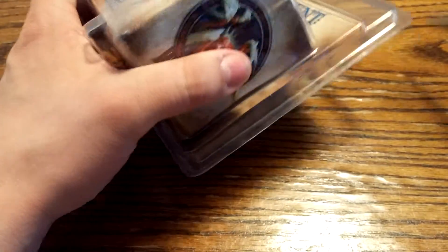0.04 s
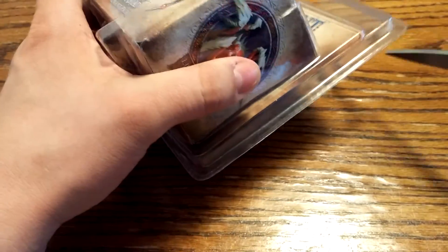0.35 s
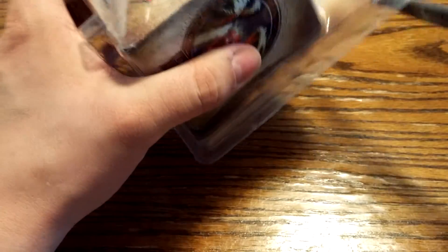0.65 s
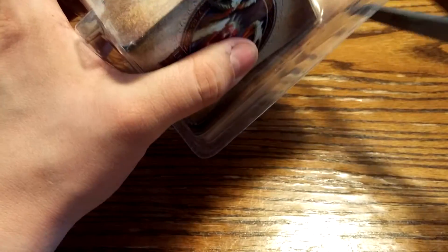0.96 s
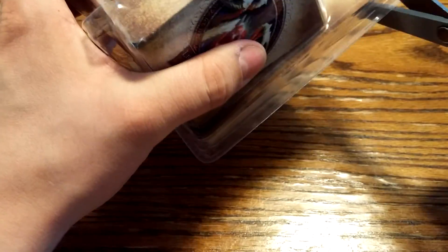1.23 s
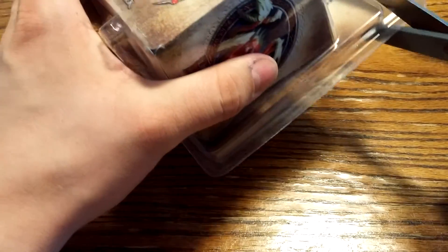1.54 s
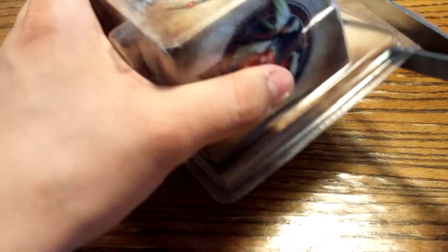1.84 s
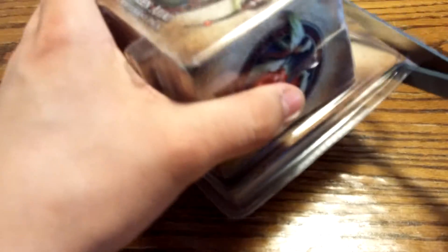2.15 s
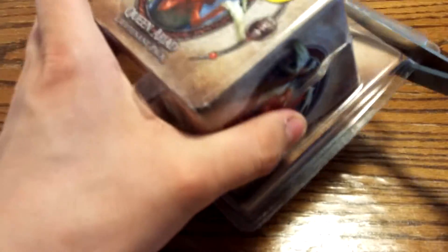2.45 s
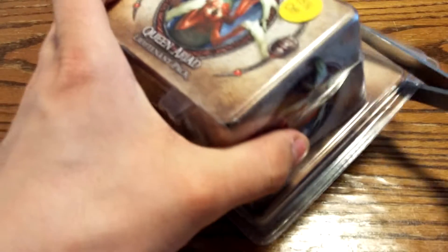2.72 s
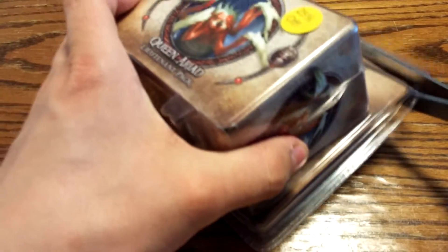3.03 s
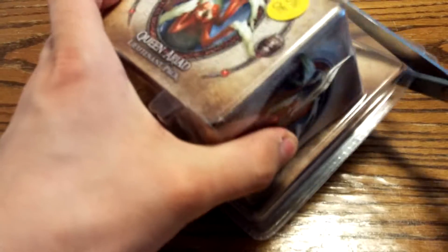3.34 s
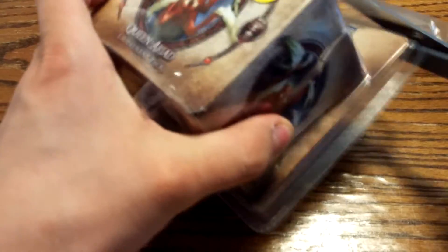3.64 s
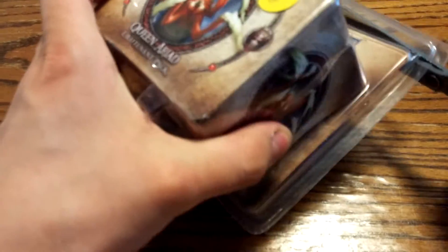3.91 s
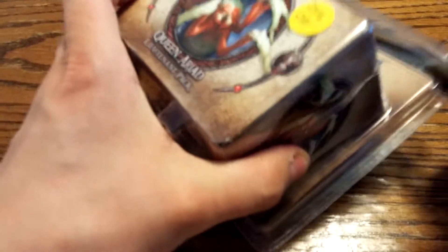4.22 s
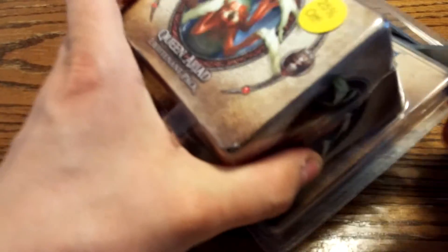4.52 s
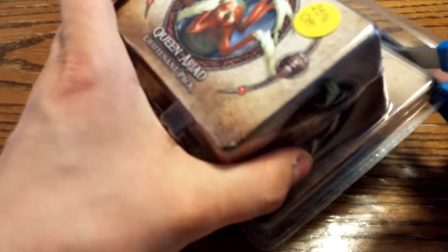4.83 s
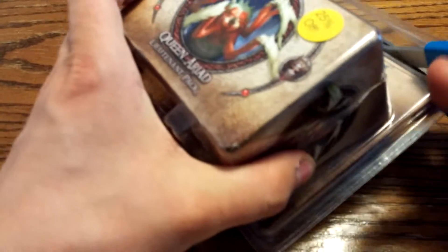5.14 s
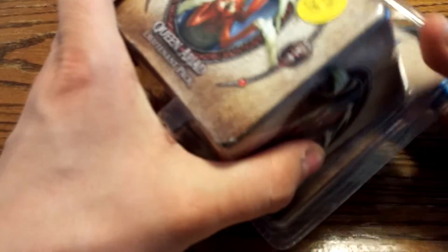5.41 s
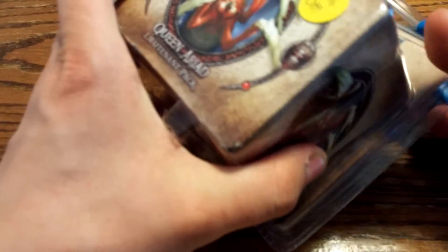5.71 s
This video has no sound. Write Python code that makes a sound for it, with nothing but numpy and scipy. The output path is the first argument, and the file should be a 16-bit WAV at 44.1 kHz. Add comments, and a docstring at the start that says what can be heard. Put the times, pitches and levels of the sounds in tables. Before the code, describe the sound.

Scissors cut into a stiff plastic blister pack on a wooden table, heard close up in a small, quiet room with a short echo. The first second is nearly silent, with only a faint scrape. A few light plastic clicks come between 1.1 and 1.8 seconds. From about 2.7 seconds small ticks and short blade scrapes gather and grow. At 3.5 seconds the shell buckles with a hollow pop, followed at once by a very loud, sharp crack. Irregular snapping continues, mixed with scrapes, tiny squeaks and soft thumps against the table. A hollow pop stands out at 4.2 seconds, a crack near 4.5, and another very loud cluster of cracks at 4.9. More snaps and knocks follow, strongest around 5.5 seconds, and die away by 5.7. The bright ticks sit slightly to the right, and the shell rings faintly after the bigger snaps.

```python
"""Scissors in a plastic pack

Scissors work into a stiff blister pack that a hand holds on a wooden table, close to the microphones.
The shell buckles with hollow pops and snaps: sharp breaks tick high, blunt ones knock, and the shell
sings on faintly. In between, the blades scrape along the rim and the strained plastic squeaks.
A small room answers, and a limiter flattens the biggest cracks."""
import sys
import numpy as np
from scipy import signal
from scipy.fft import rfft, irfft
from scipy.io import wavfile
from scipy.ndimage import uniform_filter1d, minimum_filter1d

SR = 44100
rng = np.random.default_rng(int(sys.argv[2]) if len(sys.argv) > 2 else 0)


def dump_mix(stems):
    """Bounce the given channels to the path in sys.argv[1] as a 16-bit WAV at rate SR."""
    frames = np.atleast_2d(stems).T  # one column per channel
    limited = np.clip(frames, -1, 1)  # hard clip at full scale
    pcm = np.round(limited * 32767).astype(np.int16)
    wavfile.write(sys.argv[1], SR, pcm)


N = 254456

# Tone colour of the room's steady noise: pitch_hz, level_db
ROOM_NOISE_COLOUR = [(15, -68), (25, -23), (108, -4.5), (157, -1.5), (185, -8), (317, -5), (695, -17.5),
                     (900, -13.5), (1130, -23.5), (1560, -20.5), (3500, -27.5), (16000, -28.5)]
# Tone colour of the deep rumble: pitch_hz, level_db
RUMBLE_COLOUR = [(15, -21.5), (40, 23), (90, -15.5), (200, -27), (500, -65)]
# Tone colour of the room's echo: pitch_hz, level_db
ECHO_COLOUR = [(100, -5.5), (170, -3), (220, -10), (300, -4), (450, -9), (550, -12.5), (700, -11),
               (1100, -13), (1700, -10.5), (2800, -4), (4500, -8), (10000, -9.5), (15000, -4)]
# How long the echo takes to fade by 60 dB: pitch_hz, fade_s
ECHO_FADES = [(100, .22), (300, .25), (550, .3), (1500, .29), (9000, .29), (12000, .23), (15000, .2)]
# How much of a snap spreads into the room as the hand lifts and tilts the pack: time_s, share_db
ROOM_SHARE = [(0, -2), (1.2, 3.5), (1.62, 3.5), (1.67, 2.5), (2.3, 4.5), (2.8, 7), (3.15, -5), (3.5, -3.5),
              (3.58, 0.75), (3.77, 3), (4.02, -7), (4.2, -2), (4.5, -2.5), (4.85, -1), (5.25, -2),
              (5.43, -1), (5.7, -7)]
# The hollow shell's own notes: pitch_hz, knock_level_db, knock_fade_s (to fall 60 dB), after_ring_db
SHELL_NOTES = [(151.6, -10.5, 0.092, -9), (211.2, -6.5, 0.06, -1), (279.6, -2, 0.036, 1),
               (325.8, 5, 0.033, -9), (421.5, 4, 0.042, -8), (485.3, 4.5, 0.025, 1),
               (554, -0.5, 0.071, -18.5), (660, -3, 0.053, -6), (799.6, -2.5, 0.077, -5),
               (864, 4.5, 0.037, -14.5), (963, 2.5, 0.027, -1.5), (1165, 8, 0.03, -17.5),
               (1714, -7.5, 0.018, -2.5), (2370, -11.5, .03, -0.5), (2630, -2.5, 0.019, -11),
               (3060, -2.5, .02, 0), (3725, -16, .02, -3)]
# Tone colour of the rubbed shell: pitch_hz, level_db
RUB_COLOUR = [(60, -14.5), (180, -11.5), (300, 1.5), (440, 5), (620, -5), (790, 2), (1050, -13),
              (1500, -9.5), (3000, -40)]
# Tone colour of a crack in the plastic sheet: pitch_hz, level_db
CRACK_COLOUR = [(500, -71.5), (900, 5), (1200, 5.5), (1500, -0.5), (1850, -1), (2150, -2), (2500, -3.5),
                (3200, -4), (4300, -3.5), (5500, -5.5), (9000, -48)]
# Tone colour of the sheet's sharp tick: pitch_hz, level_db
TICK_COLOUR = [(2000, -105.5), (4000, -8), (5200, 3), (7500, 0), (9800, 1.5), (11200, -5.5), (12800, -11),
               (15500, -11), (17000, -79)]
# The pack is pressed onto the table: start_s, level_db
THUMPS = [(1.34, -59.5), (1.466, -56), (1.551, -58), (3.578, -29), (4.023, -43.5), (4.184, -36),
          (4.644, -36.5), (4.857, -37), (5.006, -32.5), (5.276, -31), (5.477, -46.5), (5.505, -34)]
# Squeaks of the strained plastic, and at 2.18 s a thin hiss of the blades: start_s, length_s, pitch_hz,
# level_db
SQUEAKS = [(0.582, 0.12, 1530, -84), (2.18, 0.043, 6080, -67.5), (3.224, 0.012, 573, -50),
           (3.787, 0.0078, 1065, -39), (4.225, 0.055, 1016, -43.5), (4.336, 0.0082, 920, -44),
           (4.599, 0.019, 1673, -39.5), (4.741, 0.021, 393, -47), (5.723, 0.0065, 1564, -38)]
# Strokes of blade on plastic: start_s, end_s, strength_db, sharpness_db
SCRAPES = [(0, 0.026, -62, 2.5), (0.014, 0.219, -76.5, 2), (1.172, 1.299, -64.5, -8.5),
           (1.46, 1.535, -73.5, -3.5), (2.627, 2.68, -74, 12.5), (2.699, 2.757, -75.5, -11),
           (2.778, 2.868, -59, -2), (2.886, 2.963, -67.5, -2), (2.964, 3.167, -73, -0.5),
           (3.172, 3.208, -48.5, 3), (3.227, 3.286, -60, -7.5), (3.272, 3.339, -44, -1),
           (3.385, 3.519, -67.5, -1), (3.784, 3.865, -44.5, -5), (3.9, 3.959, -54, 0),
           (3.983, 4.05, -45, -0.5), (4.159, 4.186, -52, -10), (4.24, 4.269, -53, -11),
           (4.366, 4.408, -46.5, -1.5), (4.462, 4.467, -29.5, 3), (4.474, 4.514, -49, -7.5),
           (4.58, 4.675, -42, -1.5), (5.005, 5.032, -37, -2.5), (5.037, 5.106, -53.5, -7),
           (5.2, 5.228, -54, -4), (5.236, 5.296, -50.5, -2.5), (5.534, 5.599, -38.5, -6.5),
           (5.599, 5.662, -48, -9)]
# The blister's wall pops through and the air inside booms: start_s, pop_db, pop_hz, boom_db
POPS = [(3.5075, -19, 370, -27), (3.5096, -23.5, 886, -33), (3.5812, -15, 466, -19.5),
        (4.182, -18.5, 411, -26.5), (4.1876, -19, 417, -32.5), (4.8687, -20, 400, -25),
        (5.3846, -24.5, 656, -35.5)]
# Snaps of the plastic:
# start_s, knock_db, crack_db, tick_db, knock_hz, crack_hz, tick_hz, knock_spread_octaves, tear_s
SNAPS = [(0.263, -67, -78, -78, 620, 2300, 9400, 0.6, 0.0019),
         (0.877, -64, -70, -69, 500, 2500, 6200, 0.5, 0.0016),
         (1.1558, -43, -47.5, -56.5, 600, 2900, 6540, 0.7, 0.0031),
         (1.298, -51, -57, -55, 690, 2700, 7100, 0.34, 0.0037),
         (1.457, -63.5, -78, -81, 950, 2500, 7000, 0.6, 0.003),
         (1.544, -56.5, -69, -86, 270, 2100, 8800, 0.7, 0.0021),
         (1.618, -50.5, -46.5, -47, 670, 2900, 6300, 1.1, 0.003),
         (1.651, -56, -74, -70, 700, 3000, 8500, 0.8, 0.006),
         (1.669, -69, -62, -63, 700, 3600, 8500, 0.8, 0.001),
         (1.723, -58.5, -58.5, -67, 550, 3900, 8440, 0.5, 0.0043),
         (1.7702, -55.5, -58.5, -64, 580, 3600, 8000, 0.7, 0.0027),
         (2.229, -90, -73, -53.5, 480, 4600, 7100, 1.3, 0.0087),
         (2.445, -78, -69, -66, 430, 3300, 8600, 0.6, 0.001),
         (2.673, -64, -66, -55, 500, 3600, 10000, 0.8, 0.001),
         (2.682, -61.5, -56, -52.5, 410, 3600, 10600, 1.2, 0.0004),
         (2.698, -55, -69, -73, 530, 2900, 8200, 1.2, 0.0015),
         (2.723, -60.5, -74, -67, 500, 3600, 10000, 0.8, 0.0016),
         (2.779, -51.5, -55, -52.5, 680, 3000, 8050, 0.9, 0.0055),
         (2.794, -68, -54, -61, 600, 3000, 9500, 0.8, 0.0012),
         (2.888, -59.5, -61, -61.5, 800, 3000, 6500, 0.8, 0.0033),
         (3.071, -69, -61, -54.5, 650, 3100, 9600, 1.0, 0.0026),
         (3.0899, -61, -57, -47, 610, 4000, 8000, 0.7, 0.00097),
         (3.111, -74, -64, -51, 520, 3500, 8950, 1.3, 0.0007),
         (3.136, -55.5, -65, -67, 700, 2400, 8000, 0.6, 0.0018),
         (3.1594, -53.5, -54, -48.5, 710, 2600, 8500, 1.0, 0.00062),
         (3.1833, -44.5, -48, -38, 520, 2500, 8300, 1.0, 0.0028),
         (3.203, -50.5, -48.5, -45, 520, 2600, 7400, 0.8, 0.0033),
         (3.283, -40.5, -41.5, -48, 600, 2400, 7680, 0.8, 0.0022),
         (3.336, -45, -54, -53, 320, 2400, 7500, 0.6, 0.0053),
         (3.5063, -19.5, -23, -33.5, 750, 1850, 8250, 0.8, 0.0033),
         (3.553, -41, -50, -45, 500, 3500, 7000, 0.8, 0.0064),
         (3.5729, -11.5, -11.5, -9.5, 700, 2780, 7630, 0.9, 0.0039),
         (3.5776, -12, -15, -21.5, 803, 2070, 9200, 1.1, 0.0042),
         (3.7704, -35.5, -43.5, -49.5, 420, 3000, 9000, 0.7, 0.0026),
         (3.774, -45.5, -46, -38.5, 500, 3600, 13200, 0.8, 0.00077),
         (3.895, -48.5, -52.5, -50, 500, 3000, 8900, 1.1, 0.001),
         (3.964, -29.5, -38, -42, 350, 2000, 7570, 0.92, 0.0077),
         (3.9874, -41, -45.5, -37, 390, 2400, 6900, 1.1, 0.0008),
         (4.022, -34, -43.5, -48, 470, 2600, 7300, 0.7, 0.0048),
         (4.181, -18, -29, -27.5, 685, 2700, 7000, 0.6, 0.0025),
         (4.195, -24, -30, -25.5, 390, 2900, 8600, 0.6, 0.0024),
         (4.2167, -54, -34, -28.5, 430, 3300, 8900, 1.3, 0.0012),
         (4.284, -36.5, -40.5, -33, 560, 3600, 9200, 0.7, 0.0016),
         (4.372, -36.5, -50, -69, 560, 2300, 7800, 0.3, 0.0036),
         (4.4231, -27.5, -30, -36.5, 700, 2100, 7860, 1.3, 0.0069),
         (4.465, -21, -17, -21.5, 640, 3500, 7440, 1.2, 0.0027),
         (4.5128, -28, -27.5, -30, 1120, 2600, 7000, 1.2, 0.0031),
         (4.596, -39.5, -42, -33, 1090, 2900, 7450, 0.6, 0.0008),
         (4.6395, -36, -43.5, -44, 450, 3000, 7950, 0.8, 0.00087),
         (4.6671, -34.5, -33, -34.5, 530, 2400, 7660, 1.2, 0.0039),
         (4.691, -46, -51, -45, 600, 3200, 8400, 0.8, 0.0012),
         (4.7277, -52, -59, -47.5, 310, 3300, 8000, 0.8, 0.001),
         (4.8067, -28.5, -34, -38.5, 1080, 2100, 7800, 0.65, 0.0039),
         (4.8526, -27, -35, -26, 500, 3600, 6530, 0.8, 0.0025),
         (4.8554, -15, -13.5, -9.5, 520, 3500, 7900, 1.1, 0.0057),
         (4.8599, -17.5, -21, -17, 950, 3300, 7130, 0.9, 0.0047),
         (4.865, -32, -16.5, -19, 500, 3600, 6800, 1.0, 0.0011),
         (4.8701, -24, -24.5, -17.5, 450, 3800, 7500, 0.8, 0.00068),
         (4.888, -26, -39, -31, 444, 4000, 7500, 0.6, 0.0015),
         (4.935, -22, -25, -26.5, 510, 2700, 6800, 0.7, 0.0019),
         (5.0076, -44, -29, -45.5, 640, 1700, 7000, 1.0, 0.0095),
         (5.03, -27.5, -33, -47, 460, 2000, 6160, 0.6, 0.0044),
         (5.088, -57, -38, -50, 710, 2300, 5400, 1.3, 0.0014),
         (5.098, -41.5, -42, -50, 900, 2000, 5450, 0.8, 0.0015),
         (5.1201, -43.5, -37.5, -41.5, 650, 2700, 5800, 1.3, 0.00072),
         (5.2342, -29, -34, -41, 420, 2200, 6500, 1.3, 0.0026),
         (5.2597, -61, -63, -60, 500, 3200, 8000, 0.8, 0.00066),
         (5.2669, -43, -60, -45, 500, 3400, 7400, 0.8, 0.00072),
         (5.276, -27, -34.5, -40, 430, 1900, 6700, 1.3, 0.0042),
         (5.3829, -25, -37, -46, 400, 2200, 7040, 0.7, 0.0026),
         (5.4253, -35, -33, -25.5, 720, 3400, 5450, 1.3, 0.0006),
         (5.4452, -34.5, -33, -36, 360, 3000, 7260, 0.8, 0.00091),
         (5.4721, -19.5, -24, -21, 470, 2700, 6400, 0.6, 0.0032),
         (5.5024, -22.5, -25, -23.5, 540, 1800, 8000, 0.7, 0.0038),
         (5.556, -32.5, -33, -36, 500, 2500, 8500, 0.8, 0.0037),
         (5.566, -35, -36.5, -29.5, 500, 2800, 7150, 1.3, 0.0013),
         (5.6211, -33, -32, -20.5, 440, 3600, 7650, 1.2, 0.0026)]


def amp(db):
    """Turns decibels into a number to multiply by."""
    return 10 ** (np.asarray(db) / 20)


def value_at(table, hz):
    """Looks up a table's value at any pitch, sliding smoothly between its rows."""
    pitches, values = np.transpose(table)
    return np.interp(np.log(hz + 1), np.log(pitches + 1), values)


def add(mix, start_s, sound):
    """Mixes a sound in at the given time."""
    part = mix[:, max(0, round(start_s * SR)):][:, :sound.shape[1]]
    part += sound[:, :part.shape[1]]


def unit_level(x):
    """Scales a sound to an average (rms) level of 1."""
    return x / np.sqrt(np.mean(x ** 2) + 1e-20)


def unit_hit(x):
    """Scales a hit to the energy of 10 ms at level 1."""
    return unit_level(x) * np.sqrt(SR / 100 / x.shape[1])


def pan(db):
    """Left and right gains; a negative db puts the sound on the right."""
    return unit_level(amp([[db / 2], [-db / 2]]))


def coloured(x, colour):
    """Gives a sound a tone colour, with a filter that never rings ahead of a hit."""
    log_gain = np.log(amp(value_at(colour, abs(np.fft.fftfreq(2048, 1 / SR)))))
    taps = np.fft.ifft(np.exp(np.conj(signal.hilbert(log_gain)))).real
    return signal.fftconvolve(x, taps[None, :len(taps) // 2], axes=1)[:, :x.shape[1]]


def noise_pair(count, apart):
    """Noise at two microphones; apart (0 to 1) is the share they do not have in common."""
    noise = rng.standard_normal((3, count))
    return np.sqrt(1 - apart) * noise[0] + np.sqrt(apart) * noise[1:]


def ring(x, hz, width_hz):
    """Lets a sound ring at one pitch; a narrower width rings longer."""
    decay = np.exp(-np.pi * width_hz / SR)
    return signal.lfilter([1, 0, -1], [1, -2 * decay * np.cos(2 * np.pi * hz / SR), decay ** 2], x)


def background(hum_hz=158.6, hum_db=-80, whine_hz=1056, whine_db=-89):
    """Faint room noise and rumble, with a low hum and a thin whine."""
    t = np.arange(N) / SR
    hum = amp(hum_db) * unit_level(np.sin(2 * np.pi * hum_hz * t))
    whine = amp(whine_db) * unit_level(np.sin(2 * np.pi * whine_hz * t))
    rumble = amp(-78) * unit_level(coloured(noise_pair(N, apart=.51), RUMBLE_COLOUR))
    noise = amp(-69.5) * unit_level(coloured(noise_pair(N, apart=.44), ROOM_NOISE_COLOUR))
    return noise + rumble + hum + whine


def reflections(first_s=.001, build_s=.004, bounces_per_s=5000):
    """The room's answer to one click: bounces build up, then each pitch dies at its own speed."""
    t = np.arange(SR // 2) / SR
    bounces = rng.standard_normal((2, len(t))) * (rng.random((2, len(t))) < bounces_per_s / SR)
    bounces *= 1 - np.exp(-np.maximum(t - first_s, 0) / build_s)
    hz, times, bands = signal.stft(bounces, SR, nperseg=256)
    fade = np.exp(-np.log(1000) * times / value_at(ECHO_FADES, hz)[:, None])
    shared = 1 / (1 + (hz[:, None] / 450) ** 2)  # long waves reach both microphones alike
    bands[1] = np.sqrt(shared) * bands[0] + np.sqrt(1 - shared) * bands[1]
    tail = signal.istft(bands * fade, SR, nperseg=256)[1]
    return coloured(tail / np.linalg.norm(tail, axis=1, keepdims=True), ECHO_COLOUR)


def room_echo(x, patterns=6, split_hz=2500, low_turn_s=.003, high_turn_s=.0008):
    """The room's smooth echo; several echo patterns take quick turns so it does not sound metallic."""
    out, t = np.zeros((2, N)), np.arange(N) / SR
    mono = x.sum(0) / np.sqrt(2)
    low = signal.sosfiltfilt(signal.butter(2, split_hz, fs=SR, output="sos"), mono)
    for pattern in range(patterns):
        feed = 0
        for band, turn_s in ((low, low_turn_s), (mono - low, high_turn_s)):
            turns_away = abs((t / turn_s - pattern) % patterns - patterns / 2)
            feed = feed + band * np.cos(np.pi / 2 * np.minimum(turns_away, 1))
        out += signal.oaconvolve(feed[None], reflections(), axes=1)[:, :N]
    return pan(-1.7) * out


def after_ring(x, longest_s=.38, half_as_long_hz=1700, boost_db=2.5):
    """Away from the damping hand the shell sings on faintly at its own notes, the low ones longest."""
    out = 0
    for hz, _, _, db in SHELL_NOTES:
        fade_s = longest_s / (1 + hz / half_as_long_hz)
        width_hz = np.log(1000) / (np.pi * fade_s)
        out = out + amp(db + boost_db) * ring(x, hz, width_hz) * np.pi * width_hz / SR
    return out


def table_thumps(near_hz=(88, 135), rise_s=.012, decay_s=.0058):
    """The table takes a soft push through the pack and gives two low, short tones."""
    out, t = np.zeros((2, N)), np.arange(SR // 8) / SR
    swell = np.exp(-t / decay_s) * (1 - np.exp(-t / rise_s))
    for start_s, db in THUMPS:
        tones = sum(np.sin(2 * np.pi * hz * rng.uniform(.88, 1.137) * t) for hz in near_hz)
        add(out, start_s, amp(db) * pan(-5) * unit_hit((tones * swell)[None]))
    return out


def creaks(start_s=2.75, end_s=5.7, per_s=14, length_s=.0084, centre_hz=877, octaves=.27, db=-60):
    """Faint creaks at chance moments while the blades bear on the rim, as rows like those of SQUEAKS."""
    span_s = end_s - start_s
    return [(start_s + span_s * when, length_s, centre_hz * 2 ** (octaves * (2 * pitch - 1)), db)
            for when, pitch in rng.random((round(span_s * per_s), 2))]


def squeaks(wobble=.13, overtone_db=-14):
    """For an instant tiny slips fall into step and give a wavering pitch."""
    out = np.zeros((2, N))
    for start_s, length_s, hz, db in SQUEAKS + creaks():
        count = round(length_s * SR)
        waver = unit_level(uniform_filter1d(rng.standard_normal(count), size=30))
        angle = 2 * np.pi * np.cumsum(hz * (1 + wobble * waver)) / SR
        tone = np.sin(angle) + amp(overtone_db) * np.sin(2 * angle)
        tone *= signal.windows.tukey(count, .7)
        add(out, start_s, amp(db) * pan(-2.7) * unit_level(tone))
    return out


def blade_scrapes(slips_per_s=900, at_strength_db=-45, doubling_db=12, slip_decay_s=.004):
    """The blade sticks and slips: tiny cracks that shake the shell, packed closer in a harder stroke."""
    out = np.zeros((2, N))
    for start_s, end_s, strength_db, sharpness_db in SCRAPES:
        count = round((max(end_s - start_s, .01) + .0074) * SR)
        slip_chance = slips_per_s * 2 ** ((strength_db - at_strength_db) / doubling_db) / SR
        sizes = amp(1.5 * np.minimum(rng.exponential(1, count), 3.5))
        kicks = sizes * (rng.random(count) < slip_chance)
        slips = signal.lfilter([1], [1, -np.exp(-1 / (slip_decay_s * SR))], kicks)
        stroke = (unit_level(slips) + .3) * signal.windows.tukey(count, .4)  # .3 adds a smooth rub
        stroke = np.pad(stroke, (0, SR // 50))
        # A sharp stroke puts its energy into the tick, a blunt one into the shell.
        for colour, db, apart, side_db in ((RUB_COLOUR, strength_db - sharpness_db, .15, 0),
                                           (CRACK_COLOUR, strength_db - .4, .55, 0),
                                           (TICK_COLOUR, strength_db + sharpness_db, .7, -10.5)):
            grains = unit_level(coloured(noise_pair(len(stroke), apart) * stroke, colour))
            grains *= np.sqrt(count / len(stroke))  # the padding must not change the level
            add(out, start_s - .004, amp(db) * pan(side_db) * grains)
    return out


def wall_flip(t, hz, cycles):
    """The plastic wall jumps to its new shape: a push and a swing back."""
    progress = t * hz / cycles
    return unit_hit((progress * np.exp(-2 * progress) * np.sin(2 * np.pi * hz * t))[None])


def blister_pops(air_hz=297, fade_s=.073, rise_s=.0037):
    """The wall pops through and sets the air in the blister ringing."""
    out, t = np.zeros((2, N)), np.arange(SR // 4) / SR
    swell = np.exp(-np.log(1000) * t / fade_s) * (1 - np.exp(-t / rise_s))
    boom = unit_hit((np.sin(2 * np.pi * air_hz * t) * swell)[None])
    for start_s, pop_db, pop_hz, boom_db in POPS:
        pop = amp(pop_db) * wall_flip(t, pop_hz, cycles=1.48)
        add(out, start_s, pan(-1.2) * (pop + amp(boom_db) * boom))
    return out


def shell_knock(t, centre_hz, octaves, tear_s, flip_db=-5.5):
    """The shell flips and rings; the place where it buckles favours the notes around one pitch."""
    hz, db, fade_s, _ = np.transpose(SHELL_NOTES)[:, :, None]
    detune, size, phase, mic_offset = rng.standard_normal((4, len(hz), 1))
    weight = amp(db + .5 * size) * np.exp(-(np.log2(hz / centre_hz) / octaves) ** 2 / 2)
    signs = (-1) ** np.arange(len(hz))[:, None]  # neighbouring notes swing opposite ways
    bend = 1 + .025 * rng.uniform(-1, 1)  # bending shifts all the notes a little
    angle = 2 * np.pi * hz * bend * (1 + .012 * detune) * t + phase * tear_s * 700
    rise = 1 - np.exp(-t / (.21 * tear_s))
    swing = signs * weight * rise * np.exp(-np.log(1000) * t / fade_s)
    lag = .55 * mic_offset * (hz / 600) ** 2  # short waves differ more between the microphones
    notes = np.array([(swing * np.sin(angle + side * lag)).sum(0) for side in (-1, 1)])
    return unit_hit(unit_hit(notes) + amp(flip_db) * wall_flip(t, centre_hz, cycles=1.43))


def tear(t, tear_s, ring_s, linger_db, linger_s, apart):
    """A tear starts at once and runs for a moment; the sheet rings out longer after a long tear."""
    burst = np.exp(-np.maximum(t - tear_s, 0) / ring_s)
    linger = amp(linger_db) * np.exp(-t / (linger_s + 2 * tear_s))
    rise = 1 - np.exp(-t / (.0001 + .06 * tear_s))
    return noise_pair(len(t), apart) * (burst + linger) * rise


def sheet_crack(t, centre_hz, tear_s, bluntness_db, focus_db=3):
    """The tearing sheet gives a burst of noise around one pitch; a blunt break has less treble."""
    hz, db = np.transpose(CRACK_COLOUR)
    octaves_up = np.log2(hz / centre_hz)
    off_centre_db = focus_db * np.minimum(octaves_up ** 2, 4)
    dulling_db = 1.37 * bluntness_db * np.maximum(octaves_up - .3, 0)
    burst = tear(t, tear_s, ring_s=.003, linger_db=-20, linger_s=.005, apart=.72)
    return unit_hit(coloured(burst, list(zip(hz, db - off_centre_db - dulling_db))))


def sharp_tick(t, centre_hz, tear_s, focus_db=13.5, ring_db=-13, click_db=-3):
    """The first edge of a snap: a bright click and a burst around one pitch, with a brief ring."""
    burst = tear(t, tear_s * .5, ring_s=.0009, linger_db=-16, linger_s=.004, apart=.65)
    colour = [(hz, db - focus_db * np.log2(hz / centre_hz) ** 2) for hz, db in TICK_COLOUR]
    edge = coloured(burst, colour)
    ringing = amp(ring_db) * unit_hit(ring(edge, centre_hz, width_hz=2400))
    spike = np.diff(noise_pair(len(t) + 1, apart=.4)) * np.exp(-t / (.0003 + .3 * tear_s))
    click = amp(click_db) * unit_hit(coloured(spike, TICK_COLOUR))
    return unit_hit(unit_hit(edge) + ringing + click)


def plastic_snaps():
    """Bending waves bring the tick, then the crack, then the knock; returns direct and room sound."""
    direct, to_room = np.zeros((2, N)), np.zeros((2, N))
    t = np.arange(SR // 8) / SR
    for start_s, knock_db, crack_db, tick_db, knock_hz, crack_hz, tick_hz, octaves, tear_s in SNAPS:
        share_db = np.interp(start_s, *np.transpose(ROOM_SHARE))
        tick = amp(tick_db) * pan(-11.5) * sharp_tick(t, tick_hz, tear_s)  # the blades are on the right
        crack = amp(crack_db) * sheet_crack(t, crack_hz, tear_s, bluntness_db=max(crack_db - tick_db, 0))
        knock = amp(knock_db) * pan(-2.2) * shell_knock(t, knock_hz, octaves, tear_s)
        for delay_s, sound in ((0, tick), (.0005, crack), (.0006, knock)):
            add(direct, start_s + delay_s, sound)
            add(to_room, start_s + delay_s, amp(share_db) * sound)
    return direct, to_room


def delay_left(x, lag_s=.00007):
    """The pack lies nearer the right microphone, so its sound reaches the left one a little later."""
    delay = np.exp(-2j * np.pi * np.fft.rfftfreq(N, 1 / SR) * lag_s)
    return np.array([irfft(rfft(x[0]) * delay, N), x[1]])


def scene(low_cut_hz=55):
    """Mixes pack, table and room; the small pack gives off no deep bass."""
    snaps, snaps_to_room = plastic_snaps()
    handling = blade_scrapes() + table_thumps() + squeaks()
    pops = blister_pops()
    spreading = snaps_to_room + amp(-3) * handling + amp(-6) * pops
    pack = delay_left(snaps + handling + pops + after_ring(spreading)) + room_echo(spreading)
    low_cut = signal.butter(2, low_cut_hz, "high", fs=SR, output="sos")
    return signal.sosfilt(low_cut, pack) + background()


def suppress_noise(x, threshold_db=-56.5, range_db=3.5, softness_db=2.5):
    """Turns each band of pitches down while it is quiet, and slightly up while it is loud."""
    hz, _, bands = signal.stft(x, SR, nperseg=512)
    power = uniform_filter1d((abs(bands) ** 2).mean(0), size=9, axis=0)  # smooth across pitch
    power = uniform_filter1d(power, size=3, axis=1)  # and across time
    level_db = 10 * np.log10(abs(power) * len(hz) / 4 + 1e-16)
    quietness = (.5 - np.tanh((level_db - threshold_db) / (2 * softness_db))) / 2
    return signal.istft(bands * amp(-range_db * quietness), SR, nperseg=512)[1][:, :N]


def record(dry, ceiling_db=5, recovery_db_per_s=600, round_off_level=.88, top_hz=16300):
    """Lowers faint noise, limits and rounds off the biggest cracks, then cuts the highest treble."""
    heard = suppress_noise(dry)
    over_db = np.maximum(20 * np.log10(abs(heard).max(0) + 1e-9) - ceiling_db, 0)
    # The limiter turns down fast at a peak, then comes back up at a steady rate.
    recovery_db = np.arange(N) * recovery_db_per_s / SR
    gain_db = minimum_filter1d(recovery_db - np.maximum.accumulate(over_db + recovery_db), size=25)
    limited = heard * amp(uniform_filter1d(gain_db, size=25))
    rounded = limited / (1 + (limited / round_off_level) ** 4) ** .25
    treble_cut = signal.firwin(255, top_hz, window=("kaiser", 9), fs=SR)
    return signal.oaconvolve(rounded, treble_cut[None], "same", axes=1)


dry = scene()
out = record(dry)
dump_mix(out)
```